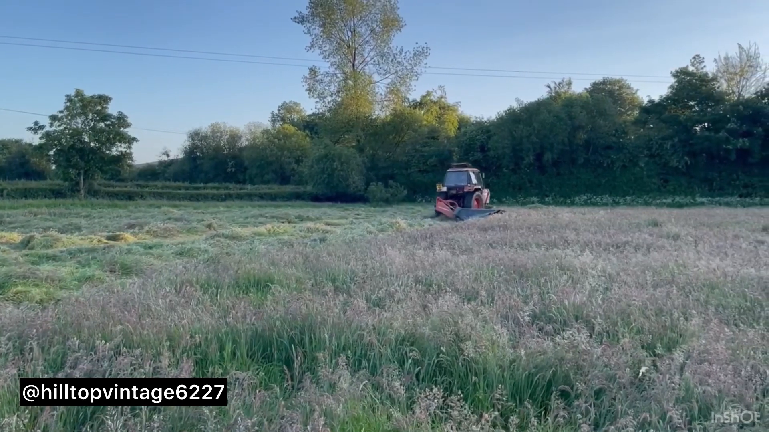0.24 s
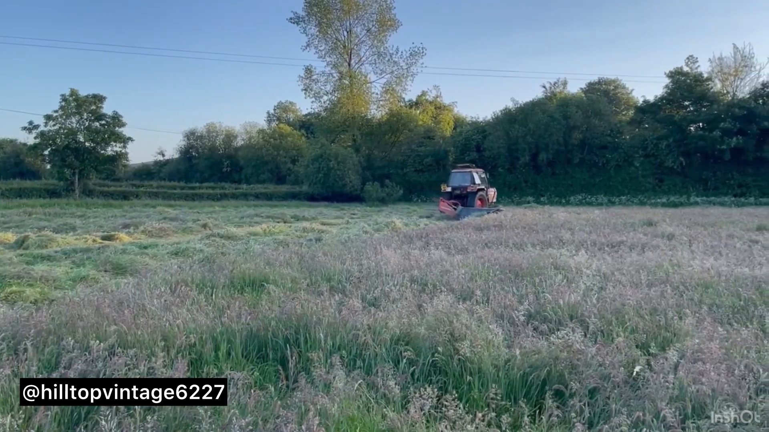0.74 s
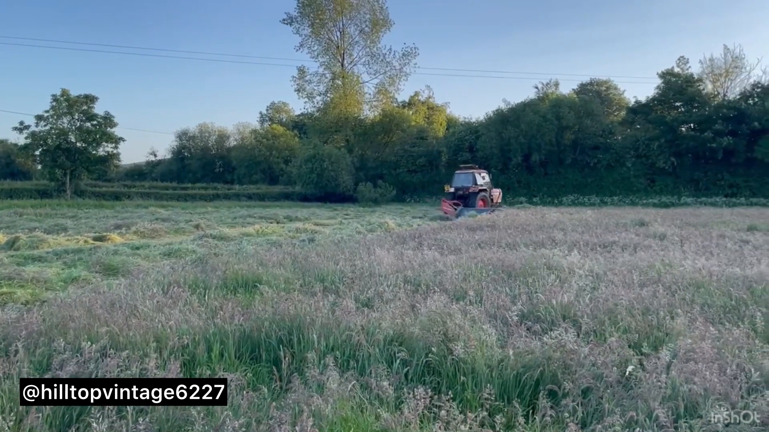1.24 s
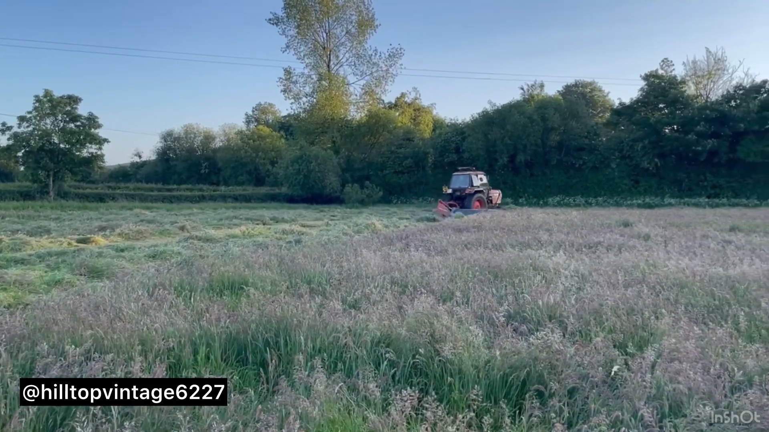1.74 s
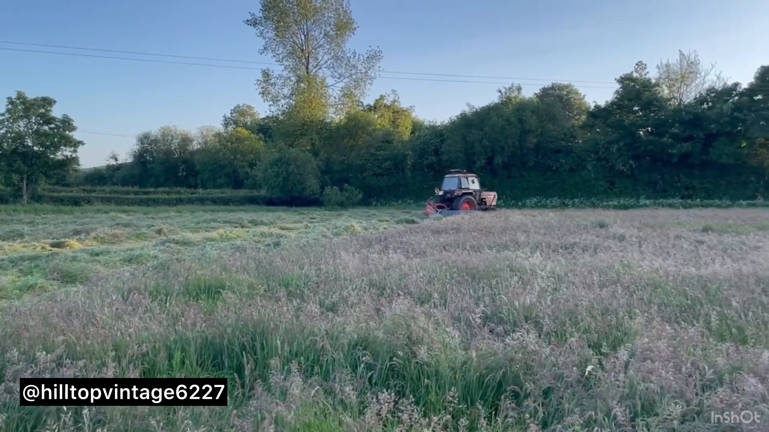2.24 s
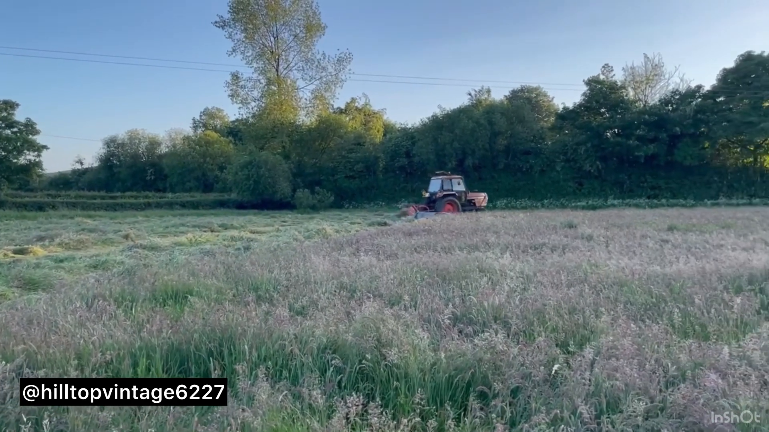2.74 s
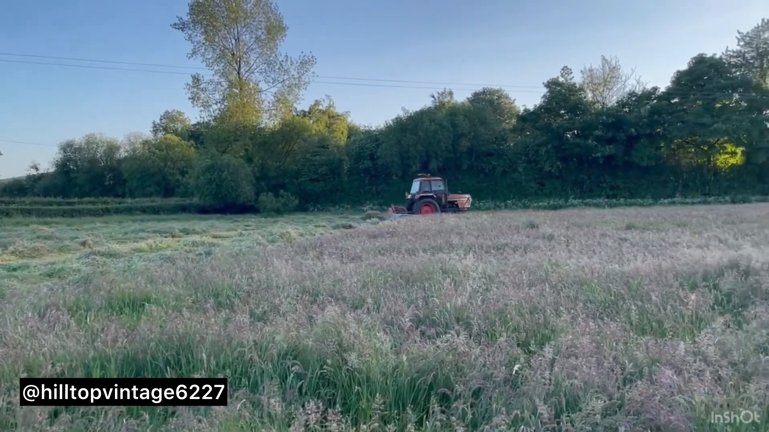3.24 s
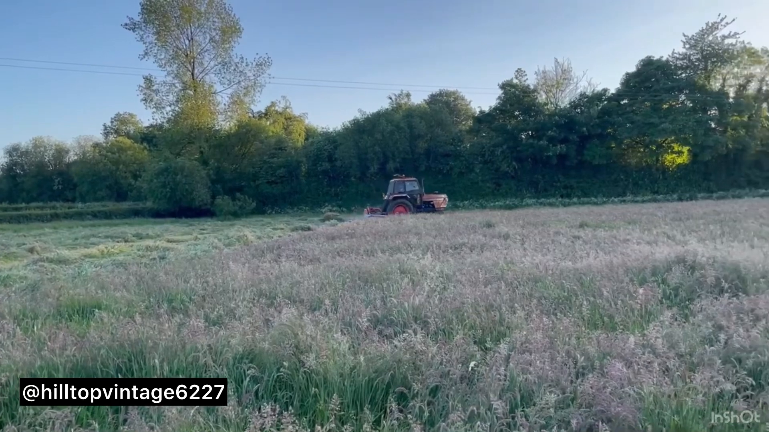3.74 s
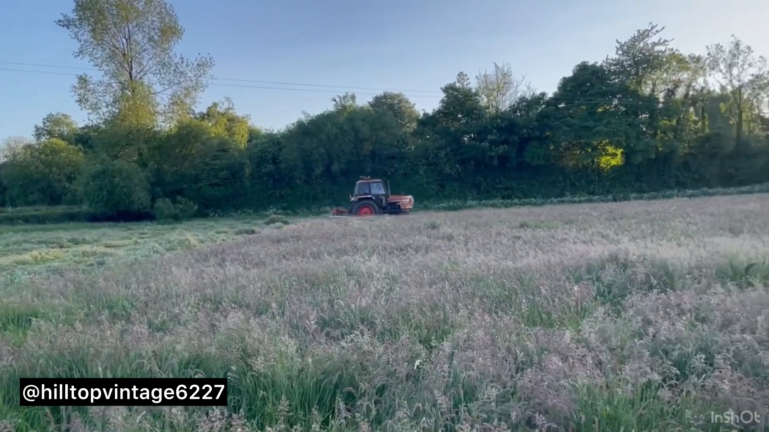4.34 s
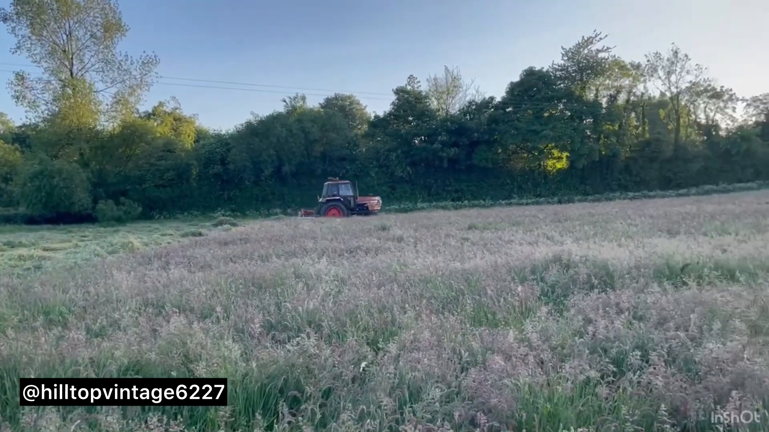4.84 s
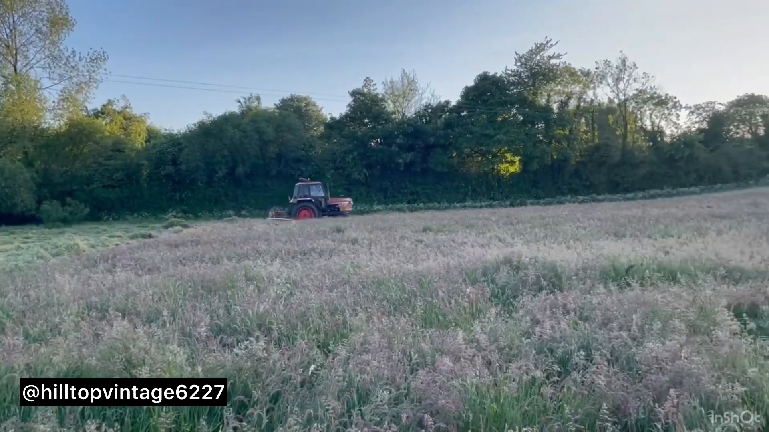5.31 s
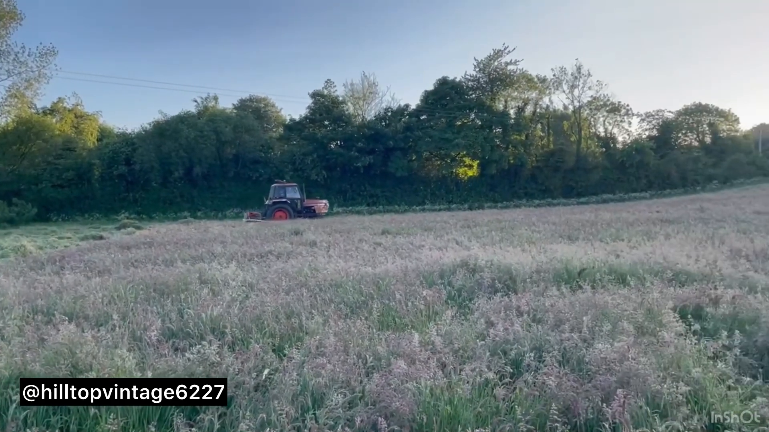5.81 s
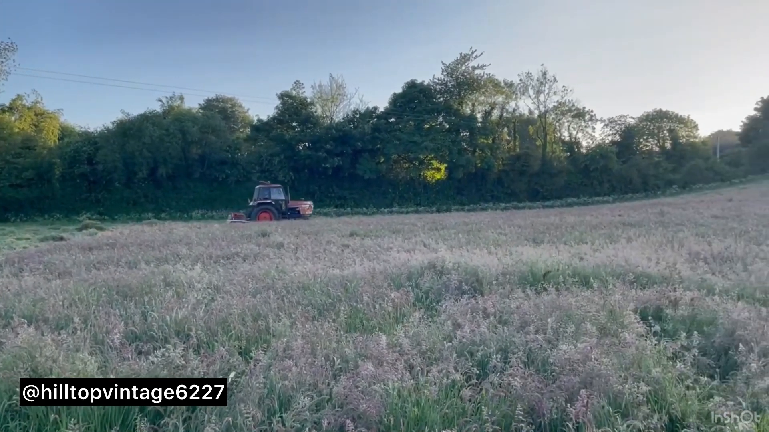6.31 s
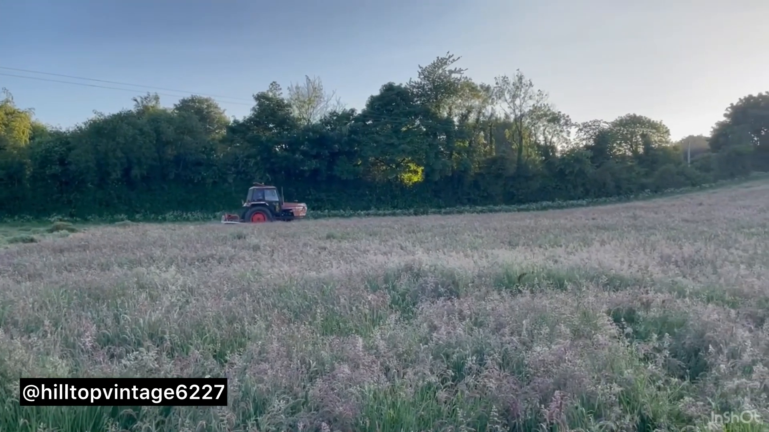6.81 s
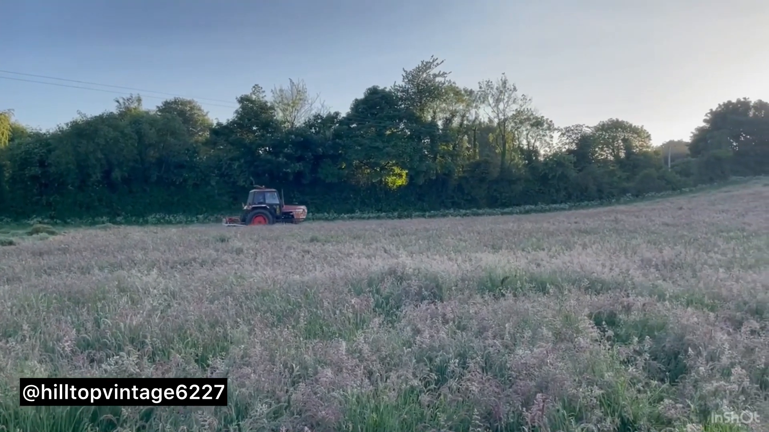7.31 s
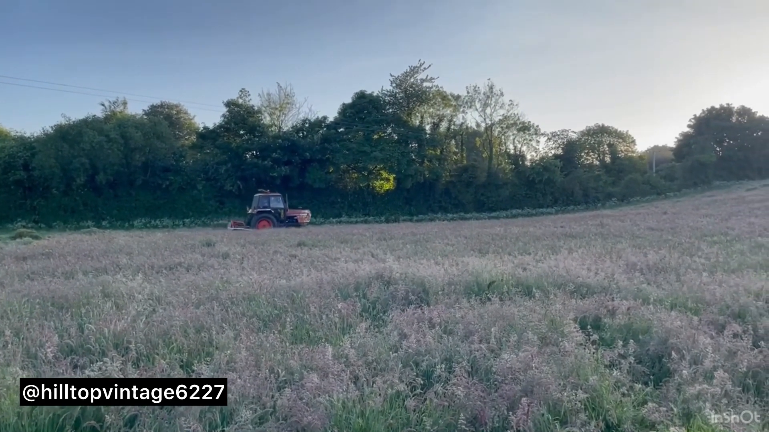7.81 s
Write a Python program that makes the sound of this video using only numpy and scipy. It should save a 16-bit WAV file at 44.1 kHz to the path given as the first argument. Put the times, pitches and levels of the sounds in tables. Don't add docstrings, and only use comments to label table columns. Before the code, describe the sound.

A diesel tractor pulling a disc mower is already running at 0 s and continues to the end at about 8 s, heard across an open field through a handheld microphone. A deep firing throb near 56 Hz and a disc hum near 84 Hz beat together, wavering slightly with load, beneath a steady, coarse roar of blades tearing grass. A thin, unsteady gear whine around 1250 Hz shows mainly in the first 1.5 s and briefly near 6.4 s. Low wind puffs rumble strongest at 0.6-1.4 s, again near 3.6 and 5.4 s. Tiny sharp dry-stalk ticks cluster at 0.6-2.8 s, then around 4.5-4.8 and 5.9 s. From roughly 3 s, as it turns away, exhaust chugging and engine knock grow clearer, with valve hiss surging around 4 and 5.4 s and faint panel rattle. No stop or fade.

```python
import sys
import numpy as np
from scipy import signal
from scipy.fft import rfft, irfft
from scipy.io import wavfile
from scipy.ndimage import uniform_filter1d

SR = 44100
rng = np.random.default_rng(int(sys.argv[2]) if len(sys.argv) > 2 else 0)


def wav_out(sig):
    wavfile.write(sys.argv[1], SR, np.round(np.clip(np.atleast_2d(sig).T, -1, 1) * 32767).astype(np.int16))


def to_linear_factor(level_db):
    exponent = np.asarray(level_db, float) / 20
    return 10 ** exponent


N = 355446
T = np.arange(N) / SR


def evened(x):
    return x / np.sqrt(np.mean(x ** 2) + 1e-20)


def curves(rows):
    s, *columns = np.transpose(rows)
    return [np.interp(T, s, c) for c in columns]


def read(points, hz):
    f, *columns = np.transpose(points)
    return np.array([np.interp(np.log(hz + 1), np.log(f + 1), c)[:, None] for c in columns])


def swells(rows):
    return sum(db * np.exp(-((T - s) / length_s) ** 2) for s, length_s, db in rows)


def wander(top_hz):
    z = rfft(rng.standard_normal(4096))
    hz = np.arange(len(z)) * SR / N
    slow = irfft(z / (1 + (hz / top_hz) ** 4))
    return evened(np.interp(T, np.arange(4096) / 4096 * N / SR, slow))


def ring(x, hz, width_hz):
    r = np.exp(-np.pi * width_hz / SR)
    return evened(signal.lfilter([1, 0, -1], [1, -2 * r * np.cos(2 * np.pi * hz / SR), r * r], x))


def ring_twice(x, hz, width_hz):
    return ring(ring(x, hz, width_hz), hz, width_hz)


def body(x, modes):
    return evened(sum(to_linear_factor(db) * ring_twice(x, hz, width_hz) for hz, width_hz, db in modes))


def tone(turns, db):
    return np.sqrt(2) * to_linear_factor(db) * np.cos(2 * np.pi * (turns + rng.random()))


def firings(cycle, pattern_db, scatter_db, late_samples):
    fired = np.floor(cycle * len(pattern_db)).astype(int)
    at = np.flatnonzero(np.diff(fired))
    chance = rng.standard_normal((len(at), 2))
    late = np.abs(late_samples * chance[:, 0]).astype(int)
    cylinder_db = np.take(pattern_db, fired[at] % len(pattern_db))
    clicks = np.zeros(N)
    clicks[np.minimum(at + late, N - 1)] = to_linear_factor(cylinder_db + scatter_db * chance[:, 1])
    return clicks


def burst(clicks, t60_s):
    decay = to_linear_factor(-60 / t60_s / SR)
    return evened(signal.lfilter([1], [1, -decay], clicks) * rng.standard_normal(N))


# time in seconds, share turned away 0-1.
TURN = [
    (0, 0),
    (1.5, 0),
    (3, 0.2),
    (4.5, 0.48),
    (5.5, 0.73),
    (6.5, 0.99),
    (8.06, 0.98),
]


def spectra(x, size=1024):
    hz, s, z = signal.stft(x, SR, nperseg=size, noverlap=size * 3 // 4)
    return hz, np.clip(np.interp(s, *np.transpose(TURN)), 0, 1), z


def samples(z, size=1024):
    return signal.istft(z, SR, nperseg=size, noverlap=size * 3 // 4)[1][..., :N]


def air():
    band = signal.butter(8, (13200, 15600), "bandpass", fs=SR, output="sos")
    hiss = evened(signal.sosfilt(band, rng.standard_normal(N)))
    return to_linear_factor(-81.5 + .7 * wander(top_hz=1.5)) * hiss * np.array([[1], [-1]])


# frequency in Hz, density in dB per Hz.
WIND_COLOUR = [(22, -23), (42, -13), (60, 7), (100, 3), (140, -1.5), (200, -7), (280, -38), (600, -120)]
# centre in seconds, length in seconds, rise in dB.
GUSTS = [
    (0, 0.15, 4),
    (.6, .12, 7),
    (1.0, 0.17, 7.5),
    (1.4, 0.13, 5.5),
    (2.0, 0.19, 4),
    (3.15, 0.15, 1.5),
    (3.65, 0.19, 5.5),
    (4.8, 0.11, 2),
    (5.45, .3, 4),
    (7.5, .15, -3),
]


def wind():
    lumpy = rng.standard_normal(N) * to_linear_factor(2.5 * wander(top_hz=9))
    hz, _, z = spectra(lumpy, size=4096)
    rumble = evened(samples(z * to_linear_factor(read(WIND_COLOUR, hz)[0]), size=4096))
    return to_linear_factor(-40.5 + swells(GUSTS) + 1.2 * wander(top_hz=3.5)) * rumble


# start in seconds, peak in dB, pitch in Hz.
TICKS = [(0.1989, -51, 9750), (0.6389, -54, 10100), (0.6549, -51, 10500), (0.6719, -39, 10280),
         (0.7632, -53, 10400), (0.8684, -54, 10900), (0.9567, -48, 11500), (0.9807, -50, 11200),
         (1.0146, -50, 11400), (1.243, -54, 10200), (1.257, -51, 10200), (1.276, -50, 10300),
         (1.3862, -47, 11200), (1.647, -52, 10300), (1.9481, -55, 9860), (2.0342, -47, 10100),
         (2.1276, -41.5, 10290), (2.2508, -49, 10400), (2.2682, -45, 10090), (2.3207, -51, 10350),
         (2.3382, -48, 10300), (2.6404, -56, 10340), (2.6759, -53, 10350), (2.6928, -55, 10500),
         (2.7811, -44.5, 10200), (4.5486, -44, 10300), (4.6356, -50, 10100), (4.8135, -54, 10600),
         (5.8632, -51, 10090)]


def stalks():
    out, t = np.zeros(N), np.arange(700) / SR
    for s, db, hz in TICKS:
        attack = np.minimum(t / 0.00095, 1)
        snap = attack * to_linear_factor(-60 * t / 0.021) * np.sin(2 * np.pi * hz * t)
        grain = ring(ring(rng.standard_normal(len(t)), hz, 1407), hz, 1400)
        scratch = 0.39 * to_linear_factor(-60 * t / 0.039) * grain
        part = out[round(s * SR):][:len(t)]
        part += (to_linear_factor(db + 4.5) * (snap + scratch))[:len(part)]
    return out


# time in seconds, pitch in Hz, level in dB.
WHINE = [(0, 1250, -59), (.18, 1244, -43), (.33, 1248, -45), (.45, 1250, -51), (.6, 1255, -43.5),
         (.9, 1252, -44.5), (1.15, 1230, -50), (1.3, 1258, -43), (1.5, 1268, -41.5), (1.56, 1251, -61.5),
         (4.4, 1256, -50.5), (6.3, 1255, -55), (6.45, 1245, -43), (6.6, 1249, -51), (8.06, 1270, -58)]


def gear_whine():
    hz, db = curves(WHINE)
    return tone(np.cumsum(hz + 3 * wander(top_hz=16.1)) / SR, db)


# time in seconds, mower roar, exhaust puff and block knock in dB.
ROAR = [(0, -39, -46, -48), (.5, -41, -54, -55), (1.1, -40.5, -42.5, -47), (2.1, -39.5, -43, -56),
        (2.9, -39.5, -40.5, -46.5), (3.6, -39, -42.5, -40.5), (4.2, -39, -38.5, -40.5),
        (5.0, -39.5, -38.5, -42), (5.7, -40, -36.5, -39.5), (6.3, -40, -41, -48), (6.8, -39.5, -36.5, -40),
        (7.3, -40.5, -42, -43.5), (7.7, -38.5, -37.5, -42), (8.06, -40.5, -37, -42)]
# frequency in Hz, density in dB per Hz.
FACING = [(180, -3.5), (280, -13.5), (350, -2), (470, -7), (760, 0.5), (1250, -3.5), (1600, -10.5),
          (2200, -4.5), (3200, -12), (3600, -10), (3850, -14.5), (4100, -13), (4500, -13.5), (4800, -14.5),
          (5300, -18), (7000, -19), (7700, -16.5), (8800, -24), (10300, -36), (11800, -39.5), (13000, -51),
          (13600, -90)]
# frequency in Hz, density in dB per Hz.
TURNED = [(180, -3.5), (290, -8), (800, 1), (1250, -2), (1650, -13), (2000, -3), (3000, -10), (3700, -16),
          (7000, -22.5), (7700, -21.5), (8800, -27.5), (10300, -40.5), (11800, -41.5), (13000, -53),
          (13600, -90)]


def blade_roar():
    hz, turned, z = spectra(rng.standard_normal(N) * to_linear_factor(.5 * wander(top_hz=29)))
    patches = uniform_filter1d(rng.standard_normal(z.shape), 9, 0)
    patches = evened(uniform_filter1d(patches, 12, 1))
    colour_db = (1 - turned) * read(FACING, hz)[0] + turned * read(TURNED, hz)[0]
    colour_db -= (5 + 5 * turned) * np.exp(-((hz[:, None] - 280) / 55) ** 2)
    above_hum = (hz > 150)[:, None]
    roar = evened(samples(z * to_linear_factor(colour_db + 0.66 * patches) * above_hum))
    return to_linear_factor(curves(ROAR)[0] + 5.5) * roar


# time in seconds, disc beat in Hz, firing tone in dB.
DRIVE = [(.15, 84.74, -27), (.5, 84.44, -33), (.96, 83.9, -29), (1.2, 84.07, -32), (1.6, 84.8, -35.5),
         (1.8, 84.1, -30), (2.3, 84.02, -31), (2.9, 84.05, -32), (3.45, 86.17, -35.5), (3.85, 85, -35.5),
         (4.3, 84.13, -31.5), (5.15, 83.57, -30.5), (5.6, 84.26, -31.5), (6.35, 84.71, -35),
         (6.72, 83.83, -30), (7.1, 85.06, -35), (7.6, 83.7, -29.5), (8.06, 84.37, -34)]
# time in seconds, disc hum in dB, blade pass in dB.
DISCS = [(.1, -32.5, -34), (.34, -37, -43), (.55, -33, -39), (1.1, -29, -45), (1.28, -31.5, -55),
         (1.6, -25, -39), (2.3, -35, -45.5), (2.9, -35, -38.5), (3.45, -37.5, -34), (4.15, -30.5, -37.5),
         (4.8, -33, -39), (4.98, -30, -45), (5.1, -27, -31.5), (5.5, -26.5, -35), (5.74, -29.5, -43),
         (6.1, -28.5, -33.5), (7.6, -32, -36), (8.06, -35.5, -39.5)]


def disc_hum():
    beats = np.cumsum(curves(DRIVE)[0]) / SR
    hum_db, octave_db = curves(DISCS)
    third_db = -52 - 7.5 * np.minimum(3 * curves(TURN)[0], 1) + 1.1 * wander(top_hz=1.3)
    return tone(beats, hum_db) + tone(2 * beats, octave_db) + tone(3 * beats, third_db)


def mower():
    return disc_hum() + blade_roar() + gear_whine()


SHAKE_DB = [0, -8, 0, -7]
# centre in seconds, length in seconds, rise in dB.
BUMPS = [(2.8, 0.084, 5), (3.96, 0.074, 4), (4.29, 0.061, 6), (4.64, .08, 3), (5.0, 0.11, 3),
         (5.4, 0.097, 6.5), (5.7, .15, 4), (6.02, .15, 7), (6.27, 0.061, 6), (6.62, .1, 4.5),
         (6.9, 0.14, 5.5), (7.58, 0.072, 5), (7.88, 0.16, 4.5)]


def panel_rattle(cycle):
    jolts = firings(cycle + .08, SHAKE_DB, scatter_db=2, late_samples=30)
    rattle = ring(ring(burst(jolts, .06), 4200, 150), 4200, 220)
    return to_linear_factor(-57.634 + 1.436 * (2 * curves(TURN)[0] + swells(BUMPS))) * rattle


# centre in seconds, length in seconds, rise in dB.
SURGES = [
    (.2, .15, 11),
    (1.0, 0.089, 14.5),
    (2.8, 0.095, 6),
    (4.0, 0.32, 12.5),
    (4.8, 0.26, 5),
    (5.4, 0.54, 9.5),
    (6.4, .4, 8.5),
    (7.4, .2, 10),
]


def valve_hiss(knocks):
    hiss = ring_twice(burst(knocks, 0.062), 5250, 2500)
    return to_linear_factor(curves(ROAR)[0] - 21.5 + swells(SURGES)) * hiss


PUFF_DB = [-10, -7, 0, -8]
# frequency in Hz, width in Hz, level in dB.
PIPE = [(360, 70, -11), (595, 90, -7), (761, 50, 0), (890, 60, -6), (960, 50, -4), (1075, 110, -7)]


def exhaust_puffs(cycle):
    puffs = firings(cycle - .05, PUFF_DB, scatter_db=.7, late_samples=3)
    puff = body(evened(puffs) + .3 * burst(puffs, .03), PIPE)
    return to_linear_factor(curves(ROAR)[1] + .8) * puff


# frequency in Hz, width in Hz, level in dB.
BLOCK = [(1990, 260, -3), (2220, 240, 0), (2750, 500, -6)]


def block_knock(knocks):
    knock = body(evened(knocks) + .3 * burst(knocks, .01), BLOCK)
    return to_linear_factor(curves(ROAR)[2] - 1) * knock


# multiple of the engine cycle, level in dB.
ORDERS_DB = [(3, -55), (5, -47), (7, -47), (9, -47), (10, -53), (11, -53), (24.87, -53), (30, -60),
             (35.8, -56), (54, -49.5), (63, -55), (68, -53), (76, -58), (28, -60), (42, -57)]
# centre in seconds, length in seconds, rise in dB.
BARKS = [
    (.48, 0.077, 12),
    (1.25, 0.29, 7.5),
    (2.0, .3, 4),
    (3.4, 0.16, 12),
    (4.3, 0.12, 2),
    (5.25, .2, 5),
    (6.3, .2, 7),
    (7.0, 0.2, 6),
    (7.72, 0.3, 10),
]


def exhaust_orders(firing, cycle):
    tone_db = curves(DRIVE)[1]
    octave_db = tone_db - 7 - 9.5 * curves(TURN)[0] + swells(BARKS) + 2.5 * wander(top_hz=2.4)
    tones = tone(firing, tone_db) + tone(2 * firing, octave_db)
    for order, db in ORDERS_DB:
        tones += tone(order * cycle, db + 3 * wander(top_hz=2))
    return tones


KNOCK_DB = [-4, -2, 0, -3]


def engine():
    firings_per_beat = .6707
    firing = np.cumsum(firings_per_beat * curves(DRIVE)[0]) / SR
    cycle = firing / len(KNOCK_DB)
    knocks = firings(cycle, KNOCK_DB, scatter_db=1, late_samples=2)
    strokes = block_knock(knocks) + valve_hiss(knocks) + exhaust_puffs(cycle)
    return exhaust_orders(firing, cycle) + strokes + panel_rattle(cycle)


# frequency in Hz, level in dB, phase in radians.
PORTS_FACING = [(90, .6, -.1), (400, -.2, -.25), (1000, -3, 0), (1700, 1, 0), (2000, -4, 0),
                (2350, -1, -.9), (2560, -2, -5.4), (2750, -1, -6.3), (4100, -1, -6.3), (4450, -5, -7),
                (4750, -20, -9.4), (5000, -5, -12.6), (6000, -4, -11.8), (8050, 0, -9.42), (8750, 0, -9.42),
                (10700, 0, -6.28)]
# frequency in Hz, level in dB, phase in radians.
PORTS_TURNED = [(90, .6, -.1), (400, -1.6, -.25), (1000, -5, -.4), (1750, -10, -1), (2270, -8, -2),
                (2520, -2, -6), (3000, -6, -6.9), (3500, -5, -7.6), (4000, -5, -5.6), (4600, -9, -7),
                (4850, -10, -9.4), (5050, -4, -12.6), (6000, -2, -12.4), (8000, 0, -9.42), (8850, 0, -9.42),
                (10700, 0, -6.28)]
# frequency in Hz, share in dB.
DIFFUSE = [(100, -20), (350, -13), (1000, -11), (1750, -5), (3600, -11), (4700, 0), (7000, -2), (8100, -28),
           (8700, -28), (9500, 0), (10300, -4), (11000, -35)]


def phone_ports(x):
    hz, turned, z = spectra(x)
    db, radians = (1 - turned) * read(PORTS_FACING, hz) + turned * read(PORTS_TURNED, hz)
    chance = rng.standard_normal((2,) + z.shape)
    spread = to_linear_factor(read(DIFFUSE, hz)[0]) * abs(z) * (chance[0] + 1j * chance[1])
    left = z + spread / 2
    right = (z - spread / 2) * to_linear_factor(db) * np.exp(1j * radians)
    return samples(np.array([left, right]))


def scene():
    return phone_ports(wind() + stalks() + mower() + engine()) + air()


def band_limit(x):
    return signal.sosfilt(signal.butter(12, 15700, fs=SR, output="sos"), x)


def record(dry):
    return band_limit(dry)


dry = scene()
out = record(dry)
wav_out(out)
```